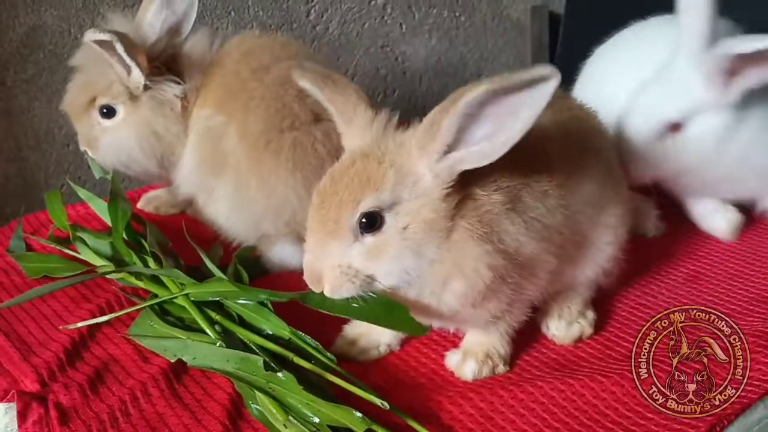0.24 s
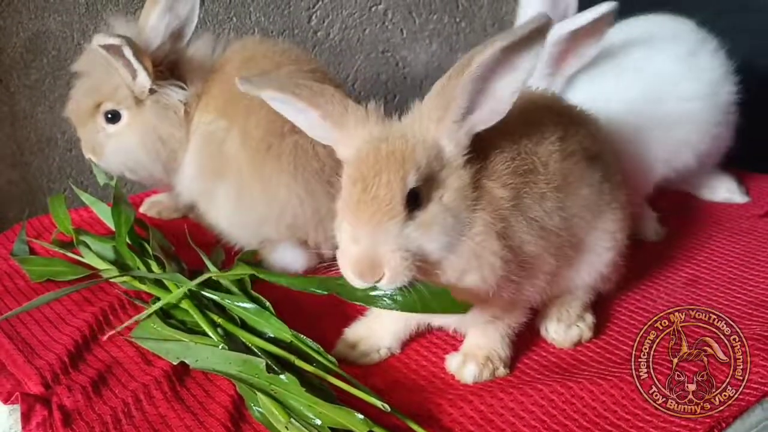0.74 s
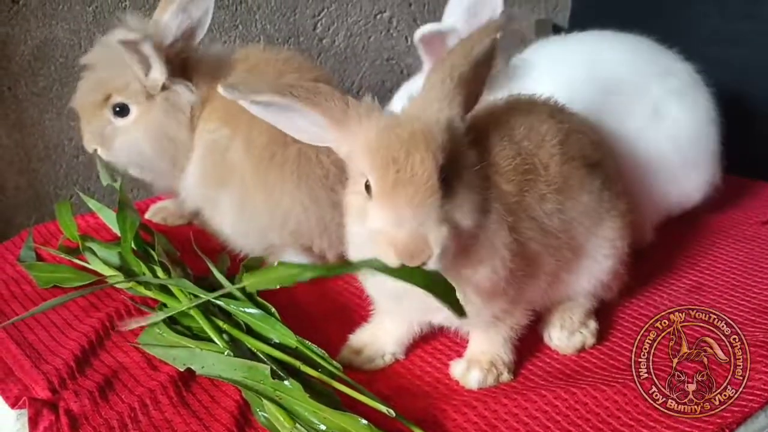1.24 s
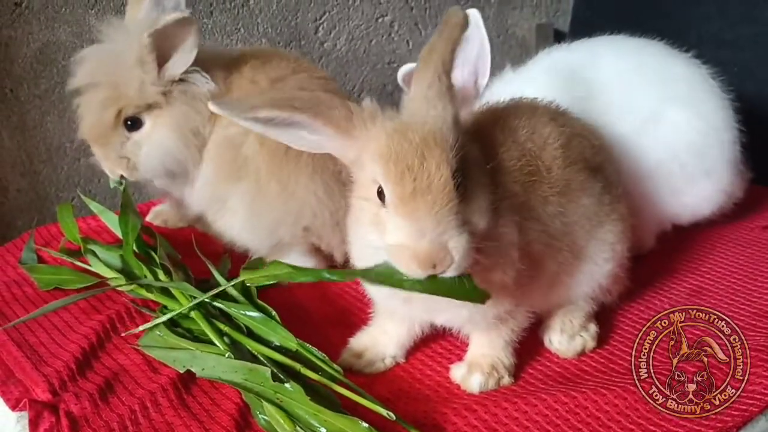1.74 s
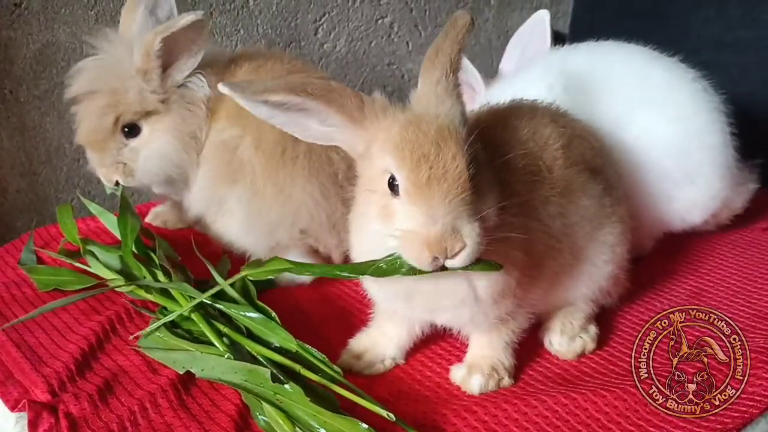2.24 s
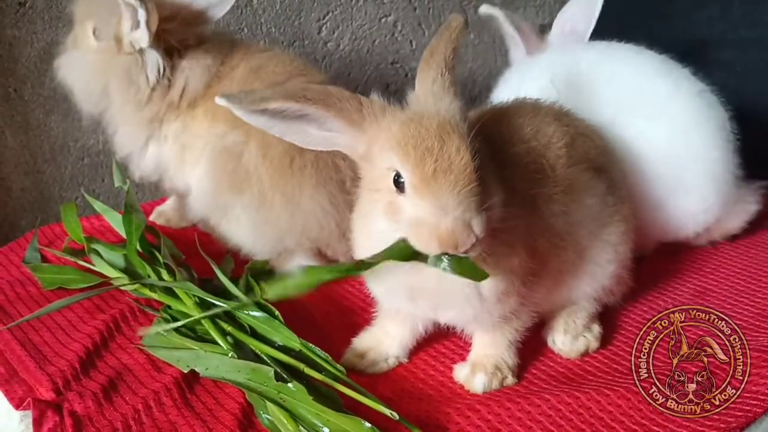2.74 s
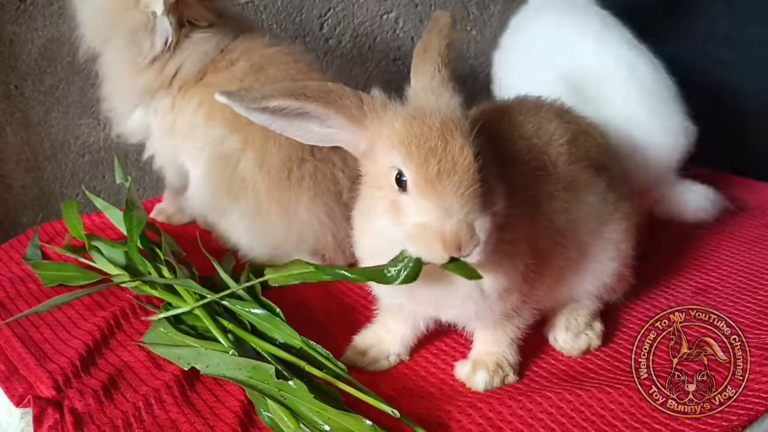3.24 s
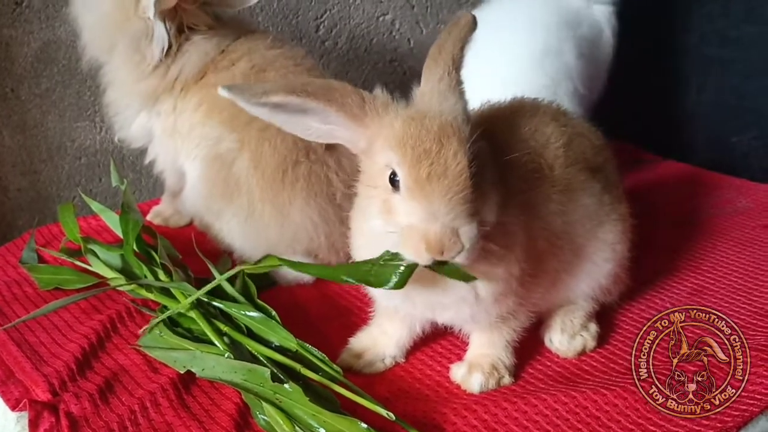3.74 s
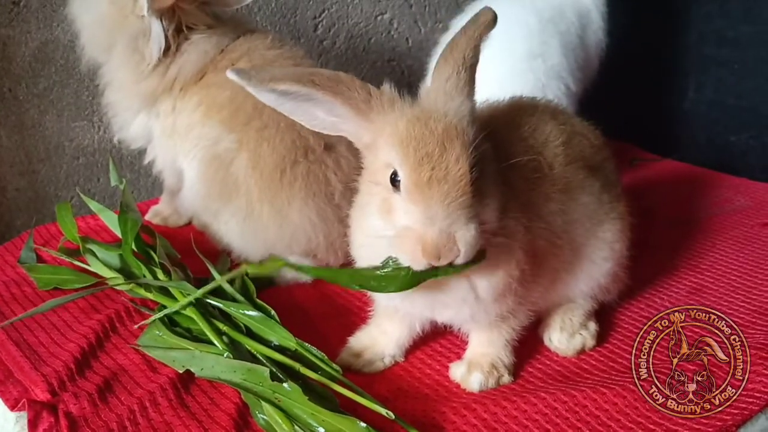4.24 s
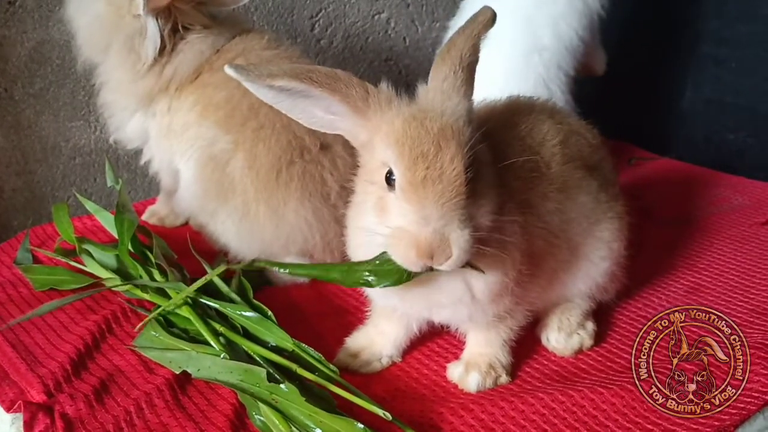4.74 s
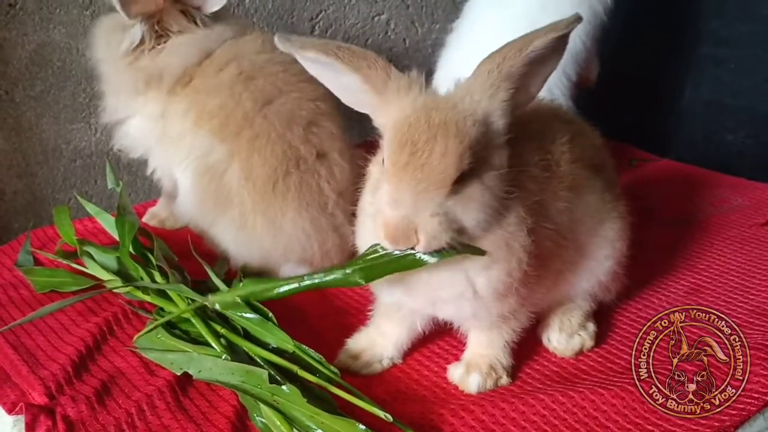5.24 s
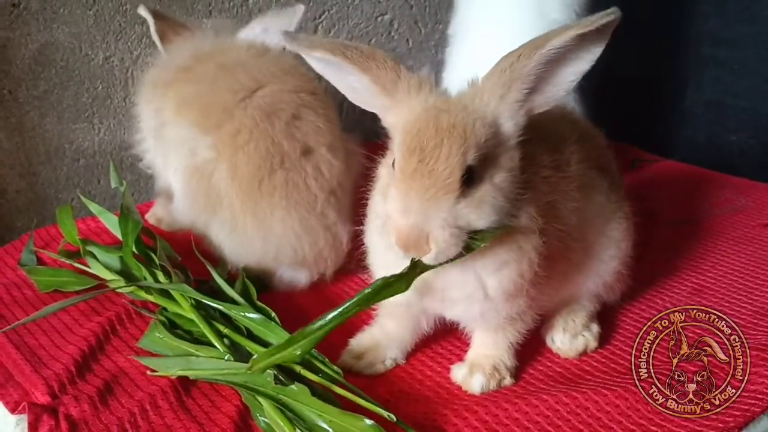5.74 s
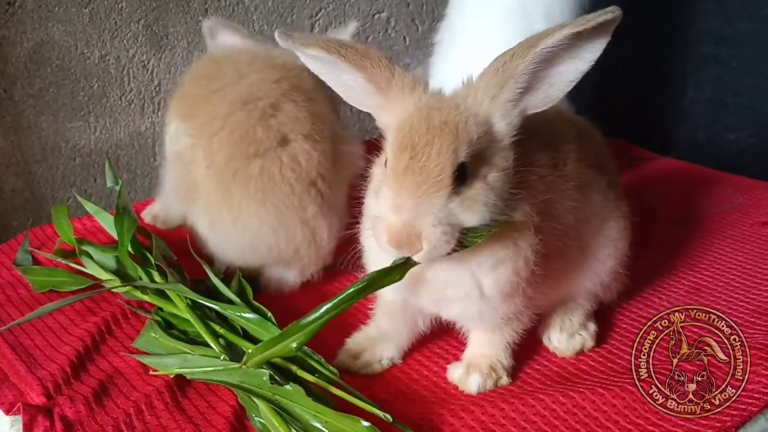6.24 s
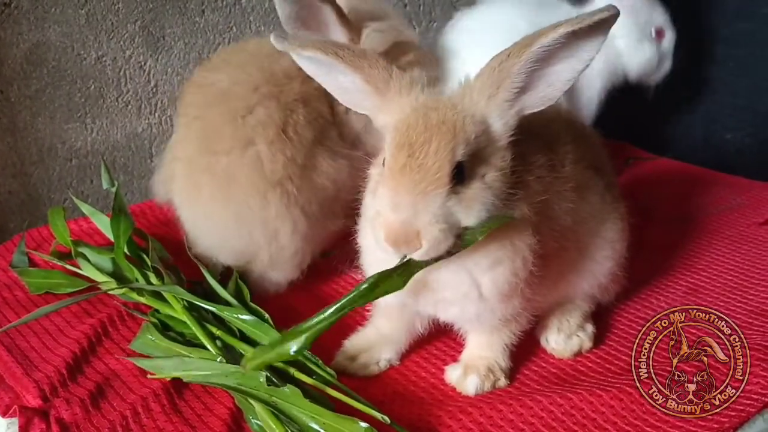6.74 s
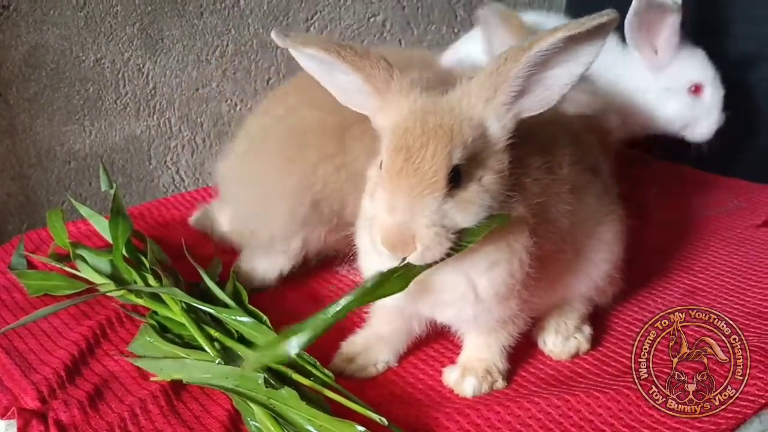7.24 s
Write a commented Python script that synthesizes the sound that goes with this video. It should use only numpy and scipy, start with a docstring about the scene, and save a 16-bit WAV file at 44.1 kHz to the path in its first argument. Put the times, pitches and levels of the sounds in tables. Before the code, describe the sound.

Young rabbits chew fresh grass right in front of the microphone in a small quiet room. Steady crisp crunches come four to five a second, each a short juicy bite with bright splinters. Leaves crackle constantly, veins snap sharply, and fur and paws brush cloth. A few dull table bumps occur; rustling grows busiest around five seconds, then faint peeps appear. Deep rumble and weak hum lie underneath.

```python
"""Young rabbits munching grass

Young rabbits chew fresh grass on a cloth-covered table, right in front of a phone in a quiet room.
The jaw grinds four to five times a second: swarms of tiny clicks are the fibres, short pops ring in the mouth.
Veins snap, leaves crackle and rustle, fur and paws brush the cloth, paws bump the table, a few peeps sound.
Below it all lie a deep rumble, a low drone, a faint hiss and a mains hum, made from noise and wavering tones."""
import sys
import numpy as np
from scipy import signal
from scipy.fft import rfft, irfft
from scipy.io import wavfile
from scipy.ndimage import uniform_filter1d

SR = 44100
rng = np.random.default_rng(int(sys.argv[2]) if len(sys.argv) > 2 else 0)


def persist_wave(psi):
    """Save psi, clipped to +-1, as 16-bit WAV."""
    counts = np.round(np.clip(psi, -1, 1) * 32767).astype(np.int16)
    wavfile.write(sys.argv[1], SR, np.atleast_2d(counts).T)


N = 330750
T = np.arange(N) / SR


def undb(db):
    """Turn decibels into gain."""
    return 10 ** (np.asarray(db) / 20)


def unit(x):
    """Scale to an rms of 1."""
    return x / np.sqrt(np.mean(x ** 2) + 1e-18)


def curve(rows):
    """Gain that follows rows of (time [s], level [dB])."""
    return undb(np.interp(T, *np.transpose(rows)))


def add(out, s, sound):
    """Mix a sound in, starting at s seconds."""
    start = int(np.clip(s * SR, 0, N - 1))
    out[start:start + len(sound)] += sound[:N - start]


def colour(x, points):
    """Filter through (frequency [Hz], level [dB]) points, with no ringing ahead; keeps white noise's power."""
    hz, db = np.transpose(points)
    f = np.maximum(np.fft.rfftfreq(N, 1 / SR), 1)
    gain = unit(undb(np.interp(np.log(f), np.log(hz), db)))
    # folding the cepstrum gives the filter its minimum phase
    cepstrum = irfft(np.log(gain), N)
    fold = 1 + np.sign(N / 2 - np.arange(N)) * (np.arange(N) > 0)
    response = np.exp(rfft(cepstrum * fold))
    return irfft(rfft(x) * response, N)


def band(x, hz, spread):
    """Broad resonance reaching from hz / spread to hz * spread."""
    edges = [hz / spread, hz * spread]
    return signal.sosfilt(signal.butter(1, edges, "bandpass", fs=SR, output="sos"), x)


def walk(rate):
    """Slow random wander, about rate new values a second, with an rms of 1."""
    k = int(SR / rate)
    steps = np.repeat(rng.standard_normal(N // k + 1), k)
    return unit(uniform_filter1d(steps, k)[:N])


def random_sizes(sign, luck, scatter_db):
    """Random sizes, up or down; a larger scatter_db lets a few stand out more."""
    return np.sign(sign - .5) * undb(scatter_db * np.minimum(-np.log(1 - luck), 4))


def fractures(rate, scatter_db):
    """Tiny fibre breaks, rate a second: single clicks, many weak and a few strong."""
    when, sign, luck = rng.random((int(rate * N / SR), 3)).T
    sizes = random_sizes(sign, luck, scatter_db)
    return unit(np.bincount((when * N).astype(int), sizes, N))


def grains(length, hz, rate, cycles, octaves, scatter_db):
    """A shower of fading pitched pops, rate a second, scattered in size and, by some octaves, around hz."""
    when, luck, detune, sign = rng.random((int(rate * length / SR) + 1, 4)).T[:, :, None]
    steps = np.arange(int(np.clip(8 * cycles * SR / hz, 40, 400)))
    pitch = np.minimum(hz * 2 ** (octaves * (2 * detune - 1)), SR / 3)
    phase = pitch * steps / SR
    pops = random_sizes(sign, luck, scatter_db) * np.sin(2 * np.pi * phase) * np.exp(-phase / cycles)
    places = (when * length).astype(int) + steps
    return unit(np.bincount(places.ravel(), pops.ravel(), length)[:length])


# the room's deep rumble: (frequency [Hz], relative level [dB per Hz])
RUMBLE = [(3, -5.5), (8, 3.5), (14, -1), (22, -12.5), (32, -12.5), (45, -15.5), (56, -16), (68, -25.5),
          (82, -29.5), (115, -32), (180, -44), (400, -74.5)]
# the room's low drone: (time [s], level [dB])
DRONE = [(0, -29), (.7, -40), (1.6, -32.5), (2.15, -32), (2.7, -37), (3.2, -31.5), (4.2, -41), (4.9, -35.5),
         (5.3, -33), (5.75, -37), (6.8, -32.5), (7.4, -53)]
# faint hiss of the air: (frequency [Hz], relative level [dB per Hz])
AIR = [(60, -5.5), (140, 2.5), (300, 1), (550, -7.5), (1000, -4.5), (2000, -15), (4000, -17), (7500, -10),
       (10000, -24), (15000, -37)]
# mains hum: (time [s], level [dB])
HUM = [(0, -45.5), (.9, -50.5), (3.2, -47.5), (5.9, -46.5), (6.05, -42), (6.7, -42), (7.5, -43)]
HUM_HZ = 100
# a faint motor tone comes and goes with the hum; level relative to it
MOTOR_HZ, MOTOR_DB = 145.7, -10.5


def background():
    """Filtered noise makes the rumble and hiss; wavering tones make the drone, mains hum and motor."""
    rumble = undb(-21.0) * colour(rng.standard_normal(N), RUMBLE)
    throb = np.sin(2 * np.pi * 59 * T + 1.5 * walk(rate=8)) * undb(3.0 * walk(rate=10))
    drone = curve(DRONE) * unit(band(throb, 62.5, spread=1.1))
    air = undb(-51.5) * colour(rng.standard_normal(N), AIR)
    mains = unit(np.sin(2 * np.pi * HUM_HZ * T + 0.23 * walk(rate=2.1)))
    motor = unit(np.sin(2 * np.pi * MOTOR_HZ * T + 0.73 * walk(rate=5)))
    hum = curve(HUM) * undb(2.0 * walk(rate=5)) * (mains + undb(MOTOR_DB) * motor)
    return rumble + drone + air + hum


# shuffling fur and paws on the cloth: (time [s], level [dB])
SHUFFLE = [(0.0, -43), (0.6, -47.5), (0.8, -50.5), (0.95, -49.5), (1.19, -50.5), (1.29, -47.5),
           (1.44, -43.5), (1.73, -47), (2.5, -44), (2.84, -48.5), (3.41, -41.5), (4.03, -48.5),
           (4.34, -45.5), (4.66, -45.5), (5.22, -42.5), (7.5, -48.5)]


def shuffle():
    """Dull brushing of fur and paws over the cloth: many small clicks, uneven in level, with little treble."""
    unevenness = undb(2.2 * walk(rate=30))
    brush = fractures(rate=3300, scatter_db=1.5) * curve(SHUFFLE) * unevenness
    return colour(brush, [(70, -9.0), (160, 2), (350, 1.5), (600, -3.5), (1100, -5.5), (2200, -7.5), (6000, -26.0)])


# how hard the lips work the leaf, which sets its fine crackle: (time [s], relative level [dB])
CRACKLE = [(0.0, -44.5), (0.55, -47.5), (0.73, -46), (0.775, -54), (0.82, -58), (0.845, -46), (1.06, -45.5),
           (1.15, -52), (1.2, -55), (1.24, -45), (1.48, -43), (2.3, -43.5), (3.05, -42.5), (3.78, -42),
           (3.87, -47), (3.94, -44), (4.1, -47), (4.2, -43), (4.33, -45), (4.41, -42), (4.9, -40),
           (4.99, -45), (5.12, -40), (5.3, -41), (5.35, -46), (5.43, -39.5), (5.6, -40.5), (5.68, -49),
           (5.85, -42.5), (5.98, -44), (6.15, -41), (6.39, -44), (6.56, -42), (6.8, -46.5), (7.12, -41.5),
           (7.28, -48), (7.5, -45)]
# before each bite the lips draw the leaf in, and it crackles more
DRAW_LEAD_S, DRAW_S, DRAW_DB = 0.09, 0.014, 1.2
# then the jaw opens and the leaf calms for a moment
PAUSE_LEAD_S, PAUSE_S, PAUSE_DB = .062, .014, -2.5


def nibbling():
    """How hard the lips work the leaf: a slow course, with a pull and a calmer moment before every bite."""
    bites = np.array(STROKES)[:, 0]
    to_next_bite = np.append(bites, np.inf)[np.searchsorted(bites, T)] - T
    draw_db = DRAW_DB * np.exp(-((to_next_bite - DRAW_LEAD_S) / DRAW_S) ** 2)
    pause_db = PAUSE_DB * np.exp(-((to_next_bite - PAUSE_LEAD_S) / PAUSE_S) ** 2)
    return curve(CRACKLE) * undb(draw_db + pause_db)


# colour of the crackling leaf: (frequency [Hz], relative level [dB per Hz])
LEAF = [(200, -9.5), (600, -1), (1500, -10.5), (2500, 0), (4500, 6.5), (7000, 8), (8400, 4), (9500, -3.5),
        (11500, -7.5), (13000, -61), (15000, -41)]


def leaves(effort):
    """Blades crackle without pause in the lips, as fine breaks and ticks, in flurries with calmer gaps."""
    flurries = undb(3.4 * walk(rate=60))
    activity = effort * flurries
    fine = colour(fractures(rate=1900, scatter_db=3.0) * activity, LEAF)
    ticks = activity * grains(N, hz=4030, rate=260, cycles=0.99, octaves=1.0, scatter_db=1.5)
    return undb(-2.0) * fine, undb(-6.0) * ticks


# juicy ribs collapsing between the teeth, up to three in a bite:
# (time [s], relative level [dB], mouth ring [Hz], splinters relative to the ring [dB])
CRUSHES = [(0.007, -33, 1120, -8), (0.219, -34, 1240, -1), (0.437, -33.0, 1210, -9.0),
           (0.645, -40, 1760, -3), (0.661, -40, 1310, 2), (0.88, -38.5, 1420, 2), (0.891, -40, 1420, -4),
           (0.905, -44, 2230, 9), (1.115, -36, 1780, -3), (1.348, -35, 1890, 1.0), (1.353, -31, 1460, -6),
           (1.36, -30, 1600, -3), (1.573, -29.0, 1590, -6), (1.772, -37, 1400, -2),
           (1.784, -38.0, 1520, -2), (1.789, -37.5, 1760, 1), (1.983, -33, 1400, -5),
           (1.989, -31.5, 1350, -10), (1.997, -33.5, 1560, -1), (2.205, -34, 1260, 1),
           (2.211, -34, 1370, -7), (2.403, -42.5, 1430, 5), (2.417, -44, 1500, -4), (2.425, -37, 1660, 2),
           (2.64, -36.5, 1300, -1), (2.648, -30.0, 1480, -6.0), (2.863, -32.5, 1540, -7.0),
           (2.868, -33.5, 1420, 0.5), (3.098, -32.5, 1520, -3.0), (3.318, -27.5, 1500, -6.5),
           (3.514, -31.5, 1600, -1.5), (3.737, -29.0, 1300, -7.5), (3.96, -33, 1700, -12),
           (3.969, -36.0, 1440, -4), (4.171, -33.0, 1400, -6.0), (4.18, -32, 1320, -5),
           (4.396, -37, 1620, -2.0), (4.406, -33.0, 1510, -2), (4.61, -28.5, 1420, -4),
           (4.616, -31, 1470, -9), (4.841, -36, 1910, -1.0), (4.857, -41.0, 1410, 2.0),
           (5.191, -42, 1450, -13), (5.205, -36, 1540, -9), (5.417, -28.5, 1550, -10),
           (5.611, -36, 1300, -5), (5.627, -29.5, 1380, -2.5), (5.828, -31, 1220, -11.0),
           (5.838, -29, 1230, -9), (6.036, -35, 1530, -5), (6.046, -35.5, 1570, 4.5),
           (6.246, -31.5, 1250, -10.0), (6.259, -38, 1510, 0.0), (6.474, -32.0, 1310, -5),
           (6.479, -31.5, 1420, 2), (6.675, -37, 1430, -1.0), (6.688, -32.5, 1220, -2.0),
           (6.887, -36, 1400, 1.0), (6.899, -30.5, 1230, -7), (6.904, -37.5, 1350, 6),
           (7.098, -43.0, 1450, 1), (7.111, -45, 1450, 11), (7.328, -39, 1660, 0)]
CRUSH_S, CRUSH_DB = .0017, .5  # width of a collapse; gain on all of them


def crushes():
    """A rib collapses within milliseconds: a tight volley of cells rings the mouth and throws off splinters."""
    out, t = np.zeros(N), np.arange(-256, 256) / SR
    collapse = np.exp(-(t / CRUSH_S) ** 2 / 2)
    for s, db, hz, splinter_db in CRUSHES:
        ring = grains(len(t), hz, rate=3000, cycles=1.6, octaves=.4, scatter_db=1.5)
        shards = grains(len(t), 4600, rate=4500, cycles=.7, octaves=.9, scatter_db=2.5)
        splinters = band(shards, 4600, spread=2)
        volley = unit(ring * collapse) + undb(splinter_db) * unit(splinters * collapse)
        add(out, s + t[0], undb(db + CRUSH_DB) * volley)
    return out


# jaw strokes: (time of hardest bite [s], strength [dB], crispness relative to the bite [dB],
# mouth resonance [Hz], relative level of the finest sizzle [dB], closing time [s])
STROKES = [(0.014, -39, -10, 1030, -66, 0.024), (0.218, -34.5, -4.5, 1060, -60, 0.03),
           (0.43, -35, -3.5, 1230, -71, 0.026), (0.652, -36, -3, 1260, -57, 0.029),
           (0.892, -37.5, -6, 1390, -63, .032), (1.114, -39.5, -5.5, 1560, -70, 0.023),
           (1.354, -32.5, -5.5, 1430, -64, 0.034), (1.565, -33, -5, 1550, -64, 0.024),
           (1.785, -35, -8, 1390, -60, 0.027), (1.994, -33.5, -3, 1360, -64, 0.022),
           (2.21, -37, -4.5, 1260, -75, 0.043), (2.418, -34.5, -4, 1420, -71, 0.028),
           (2.645, -33, -4, 1390, -63, 0.025), (2.867, -30.5, -4, 1450, -54, 0.025),
           (3.099, -33.5, -7, 1570, -59, 0.03), (3.312, -32.5, -4, 1430, -70, 0.028),
           (3.514, -34.5, -13, 1400, -67, 0.031), (3.734, -31.5, -7, 1270, -65, 0.022),
           (3.968, -36.5, -2, 1360, -65, 0.036), (4.178, -31, -6.5, 1400, -75, 0.025),
           (4.404, -33.5, -7, 1330, -67, 0.03), (4.615, -29, -2, 1430, -60, 0.019),
           (4.846, -34.5, -3.5, 1630, -58, 0.03), (5.004, -40.5, -12, 1080, -66, 0.051),
           (5.204, -36, -19, 1250, -73, 0.034), (5.412, -32.5, -5, 1430, -66, 0.028),
           (5.619, -28.5, -5, 1310, -71, 0.024), (5.829, -33, -3.5, 1200, -75, 0.031),
           (6.042, -29.5, -6, 1320, -56, 0.024), (6.254, -31, -1.5, 1410, -61, 0.017),
           (6.474, -35.5, -0.5, 1240, -65, 0.025), (6.684, -35.5, -0.5, 1300, -64, 0.024),
           (6.898, -35, -0.5, 1290, -67, 0.024), (7.108, -38, -1, 1370, -59, 0.033),
           (7.327, -36.5, 1, 1370, -64, 0.024)]
# colours of the dull breaks, crisp splinters and thin sizzle: (frequency [Hz], relative level [dB per Hz])
MOUTH = [(120, -8), (200, -5.5), (300, 1.5), (600, -12), (850, -6.5), (1200, 0), (1650, -2), (2000, -8),
         (2400, -3), (3200, -22), (6000, -15.5), (12000, -73)]
CRISP = [(900, -19), (2000, -21), (3000, 2.5), (5000, -3), (7200, 2.5), (8500, -0.5), (10000, -15.5),
         (13000, -38), (15000, -53)]
SIZZLE = [(6000, -48), (10000, 2), (12000, 2.5), (13000, -24), (14200, 6), (15500, -3)]
CRUNCH_SHARE, OPENING_SHARE = .37, .72  # lengths as shares of the closing time
GRIND_DB, CRUNCH_DB = 1.5, -4  # relative to the stroke's strength
SAP_HZ, SAP_DB = 3230, -5  # wet clicks in the bite; level relative to its crispness
SIZZLE_LAG_S, SIZZLE_S = 0.015, 0.02  # delay after the bite; width


def chewing():
    """Pressure builds as the teeth slide in, peaks in a short crunch and lets go; a thin sizzle follows."""
    force, crisp, sizzle, pops, wet = np.zeros((5, N))
    for s, db, crisp_db, mouth_hz, sizzle_db, closing_s in STROKES:
        near = slice(max(int((s - .15) * SR), 0), int((s + .15) * SR))
        d = T[near] - s
        fade_s = closing_s * np.where(d < 0, 1, OPENING_SHARE)
        grind = undb(db + GRIND_DB) * np.exp(-np.abs(d) / fade_s)
        crunch = undb(db + CRUNCH_DB) * np.exp(-(d / (CRUNCH_SHARE * closing_s)) ** 2)
        bite = np.hypot(grind, crunch)
        crisp_bite = undb(crisp_db) * bite
        force[near] += bite
        crisp[near] += crisp_bite
        sizzle[near] += undb(sizzle_db) * np.exp(-((d - SIZZLE_LAG_S) / SIZZLE_S) ** 2)
        # juicy cells burst and ring in the mouth, which is shaped differently for each stroke
        pops[near] += bite * grains(len(d), mouth_hz, rate=380, cycles=2.0, octaves=0.45, scatter_db=3.0)
        # sparser, brighter clicks of sap stand out from the grinding
        wet[near] += crisp_bite * grains(len(d), SAP_HZ, rate=240, cycles=1.8, octaves=1.0, scatter_db=3.0)
    # the teeth catch and slip on the fibres
    catch = undb(3.2 * walk(rate=300) - .8)
    breaks = colour(fractures(rate=1300, scatter_db=2.6) * catch * force, MOUTH)
    splinters = colour(fractures(rate=1500, scatter_db=1.8) * catch * crisp, CRISP)
    fizz = colour(rng.standard_normal(N) * sizzle, SIZZLE)
    dry_parts = undb(-1.5) * breaks + undb(0.5) * splinters + undb(13.0) * fizz
    return dry_parts + undb(SAP_DB) * wet + undb(-6.0) * pops


# leaves dragged and torn:
# (time [s], level [dB], half length [s], centre pitch [Hz], grit relative to the squeak [dB])
RUSTLES = [(0.079, -33, 0.00082, 2600, 4), (0.745, -34.5, .003, 3200, 13), (0.753, -30, .0016, 4780, 7),
           (1.257, -40, .008, 5600, 1), (1.382, -26.5, 0.0021, 2120, -10), (1.532, -31, 0.0049, 1710, -2),
           (2.606, -31.5, 0.0022, 1500, -4), (2.622, -30, 0.0048, 2060, 0), (2.805, -35.5, 0.0091, 5000, 2),
           (4.268, -37, .005, 3550, 4), (4.286, -38, 0.0056, 4400, 2), (4.877, -26.5, 0.0026, 1550, -1),
           (4.903, -24, 0.0049, 4200, 4), (4.924, -26.5, 0.0091, 2920, -3), (4.947, -35, 0.0033, 2530, -8),
           (5.001, -28, 0.0035, 1080, -16), (5.053, -29, 0.0018, 3860, -2), (5.068, -32, 0.017, 2210, 11),
           (5.112, -27.5, 0.0039, 3300, 5), (5.122, -30, 0.0067, 5260, 2), (5.293, -31, 0.01, 2600, 15),
           (5.309, -29, 0.0031, 5300, 3), (5.322, -38, 0.0046, 3500, 7), (5.481, -30, .003, 2400, -9),
           (5.486, -30, .004, 2940, 1), (5.498, -30, 0.0036, 2000, 0), (5.513, -35, .003, 2750, -4),
           (5.604, -31, .0018, 5540, 10), (5.78, -21.5, 0.0012, 1530, 16),
           (5.835, -29.5, 0.0096, 1200, -10), (5.884, -32, 0.0094, 2200, 12),
           (6.388, -29.5, 0.0045, 6130, -9), (6.598, -25, 0.0015, 5400, 2), (6.938, -33, 0.0062, 4940, 10),
           (7.329, -41, 0.0017, 2420, 8)]


def rustles():
    """Short showers of pops as a leaf is dragged or torn: the taut blade squeaks near one pitch, tearing adds grit."""
    out = np.zeros(N)
    for s, db, length, hz, grit_db in RUSTLES:
        near = slice(int((s - .06) * SR), int((s + .06) * SR))
        d = T[near] - s
        blade = grains(len(d), hz, rate=1100, cycles=3.2, octaves=.22, scatter_db=2.6)
        grit = grains(len(d), hz, rate=1500, cycles=0.26, octaves=1.16, scatter_db=3.5)
        pull = np.exp(-(d / length) ** 2 / 2)
        shower = unit((blade + undb(grit_db) * grit) * pull)
        out[near] += undb(db) * shower * np.sqrt(np.mean(pull ** 2))
    return out


# thick leaf veins snapping: (time [s], relative level [dB], pitch [Hz])
SNAPS = [(0.634, -19, 4100), (0.746, -19, 3800), (0.753, -14, 4800), (0.892, -11, 2800), (0.982, -18, 3300),
         (1.008, -17, 5300), (1.266, -21, 5500), (1.479, -18, 5200), (1.488, -16, 4200), (1.67, -20, 3700),
         (1.765, -17, 2200), (1.841, -11, 4200), (1.907, -18, 5600), (1.954, -13, 2900), (1.969, -17, 2700),
         (2.094, -13, 4400), (2.125, -16, 5400), (2.187, -19, 3100), (2.21, -9, 2100), (2.366, -14, 3500),
         (2.417, -10, 3000), (2.455, -20, 2900), (2.47, -17, 3100), (2.691, -16, 3400), (2.703, -19, 3400),
         (2.783, -20, 4500), (2.788, -17, 5600), (2.798, -20, 5000), (2.976, -15, 4400), (2.999, -19, 5000),
         (3.068, -17, 2000), (3.147, -19, 3500), (3.222, -20, 4500), (3.236, -20, 3600), (3.358, -20, 2800),
         (3.424, -20, 3600), (3.553, -18, 3600), (3.57, -14, 4200), (3.604, -16, 4600), (3.609, -19, 4300),
         (3.696, -15, 2300), (3.709, -19, 4500), (3.785, -17, 2700), (3.814, -20, 4200), (3.856, -5, 3800),
         (4.042, -20, 4400), (4.208, -20, 3100), (4.222, -21, 2900), (4.233, -16, 2900), (4.256, -12, 3100),
         (4.262, -20, 4100), (4.267, -20, 3600), (4.294, -16, 4000), (4.3, -16, 4300), (4.338, -16, 3700),
         (4.352, -10, 3900), (4.477, -9, 2900), (4.484, -17, 3100), (4.536, -20, 4400), (4.543, -9, 6400),
         (4.588, -14, 4500), (4.673, -16, 2700), (4.69, -12, 2900), (4.725, -11, 4700), (4.782, -19, 4900),
         (4.808, -20, 3000), (4.875, -7, 2600), (4.901, -11, 3700), (5.053, -17, 3500), (5.081, -16, 2100),
         (5.088, -13, 2300), (5.128, -8, 3600), (5.153, -18, 2200), (5.162, -14, 5900), (5.184, -19, 4000),
         (5.289, -11, 3200), (5.314, -18, 3100), (5.33, -20, 3100), (5.509, -18, 2700), (5.54, -6, 2800),
         (5.711, -12, 2800), (5.753, -21, 5200), (5.894, -18, 2400), (5.957, -20, 3500), (6.135, -19, 3800),
         (6.167, -20, 6300), (6.189, -20, 5700), (6.218, -18, 2200), (6.29, -19, 3600), (6.387, -14, 5600),
         (6.394, -20, 5300), (6.409, -14, 6000), (6.541, -19, 3500), (6.75, -8, 3100), (6.94, -16, 3200),
         (7.021, -18, 4000), (7.028, -18, 4500), (7.181, -15, 4100), (7.238, -13, 4600), (7.328, -7, 3100),
         (7.391, -17, 4200), (7.445, -11, 5900)]
# small veins snap at random; middle level relative to the lips' effort, middle pitch
SMALL_SNAPS_PER_S, SMALL_SNAP_DB, SMALL_SNAP_HZ = 14, 17, 4200


def veins(effort):
    """All snaps as (time, level, pitch): the thick veins, and small random ones, louder as the lips work harder."""
    small = []
    for when, size, pitch in rng.random((int(SMALL_SNAPS_PER_S * N / SR), 3)):
        i = int(when * N)
        db = 20 * np.log10(effort[i]) + SMALL_SNAP_DB + 5 * (size - .5)
        small.append((T[i], db, SMALL_SNAP_HZ * 2 ** (1.5 * (pitch - .5))))
    return list(SNAPS) + small


CRACK_DB = -3.7  # the crack's peak relative to the snap's level


def snaps(effort):
    """Each snapping vein is one sharp crack in a short burst of fine crackle."""
    out, t = np.zeros(N), np.arange(-500, 500) / SR
    for s, db, hz in veins(effort):
        crack = rng.choice([-1, 1]) * np.sin(2 * np.pi * hz * t) * np.exp(-(t / .00016) ** 2)
        crack = crack / np.abs(crack).max()
        pops = grains(len(t), hz, rate=5300, cycles=0.2, octaves=0.65, scatter_db=-1.0)
        crackle = pops * np.exp(-np.abs(t) / 0.0028)
        crackle_db = -21.5 + 3 * np.log2(hz / 3000)  # higher snaps crackle more
        add(out, s + t[0], undb(db) * (undb(CRACK_DB) * crack + undb(crackle_db) * crackle))
    return out


# paws and stalks bumping the table: (time [s], peak level [dB], brightness of the contact [Hz])
BUMPS = [(1.294, -31, 330), (1.382, -20, 1140), (2.103, -32, 520), (3.243, -17.5, 282), (3.296, -26, 380),
         (3.415, -31, 302), (4.848, -28.5, 335), (5.31, -25, 650), (5.36, -28.5, 650), (5.578, -22.5, 520),
         (5.787, -27.5, 600), (5.836, -28, 700), (7.494, -24.5, 400)]
# ringing tones of the table top: (frequency [Hz], relative level [dB], time to fade by 60 dB [s])
TABLE = [(173, -5, 0.035), (264, -6.5, 0.069), (375, -5.5, 0.035), (506, -8.5, 0.058), (640, -5, 0.021),
         (701, -12.5, 0.14), (960, -9, 0.045), (1230, -13, 0.062), (1590, -10, .06), (1710, -16, 0.08)]


def bumps():
    """A soft contact pushes slowly and rings the low tones of the table, a hard one the higher."""
    out, t = np.zeros(N), np.arange(SR // 5) / SR
    for s, db, contact_hz in BUMPS:
        ring = np.zeros(len(t))
        for hz, mode_db, t60 in TABLE:
            strength = undb(mode_db - 10.0 * np.log2(hz / contact_hz) ** 2)
            detuned_hz = hz * (1 + 0.019 * rng.standard_normal())
            ring += strength * np.exp(-np.log(1000) * t / t60) * np.sin(2 * np.pi * detuned_hz * t)
        ring = ring * (1 - np.exp(-t * contact_hz * 2))  # the push builds up over about half a cycle
        add(out, s, undb(db) * ring / np.abs(ring).max())
    return out


# faint thin peeps: (time [s], level [dB], pitch [Hz])
PEEPS = [(6.329, -37, 4240), (6.509, -36, 4280), (6.535, -43, 4300), (6.611, -40, 4260)]


def peeps():
    """A few short squeaks: pure tones that swell and fade within milliseconds, with a quavering pitch."""
    quaver = .8 * walk(rate=250)
    out = np.zeros(N)
    for s, db, hz in PEEPS:
        swell = np.exp(-((T - s) / 0.0056) ** 2)
        out += undb(db) * swell * np.sin(2 * np.pi * hz * T + quaver)
    return out


def room(x, t60, wet_db):
    """Faint short reflections from the wall and table: a fading noise tail that starts after 2 ms."""
    t = np.arange(SR // 3) / SR
    noise = band(rng.standard_normal(len(t)), 1580, spread=2.5)
    tail = noise * np.exp(-np.log(1000) * t / t60) * (t > .002)
    return x + undb(wet_db) * signal.fftconvolve(x, tail / np.linalg.norm(tail))[:N]


def scene():
    """All the small sounds of feeding, close up, over the room's background."""
    effort = nibbling()
    fine, ticks = leaves(effort)
    softening = signal.butter(4, 9000, fs=SR, output="sos")  # the extreme treble of the leaf sounds is softened
    blades = signal.sosfilt(softening, snaps(effort) + crushes() + rustles() + ticks)
    near = chewing() + blades + fine + bumps() + shuffle() + peeps()
    heard = room(near, t60=.14, wet_db=-19)
    return heard[None] + background()


CEILING = .43  # level that the rounded peaks approach
TOP_HZ = 15800  # little passes above this


def record(dry):
    """The phone rounds off the tallest peaks and cuts the extreme treble."""
    rounded = dry / (1 + (dry / CEILING) ** 6) ** (1 / 6)
    return signal.sosfilt(signal.ellip(8, .2, 70, TOP_HZ, fs=SR, output="sos"), rounded)


dry = scene()
out = record(dry)
persist_wave(out)
```